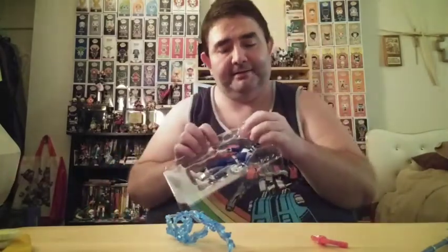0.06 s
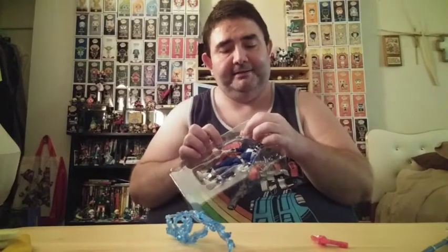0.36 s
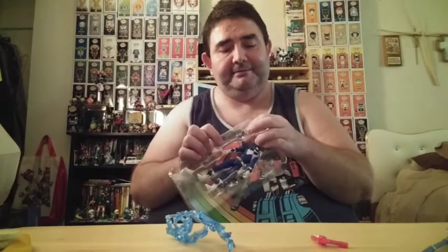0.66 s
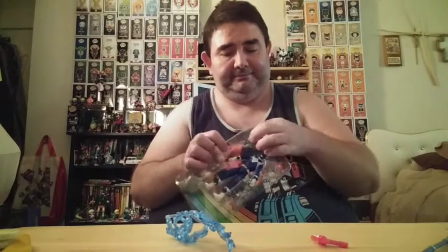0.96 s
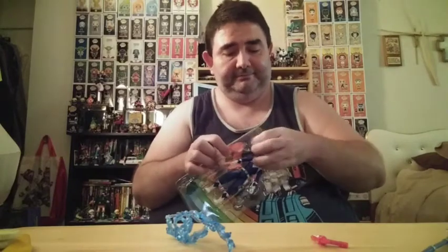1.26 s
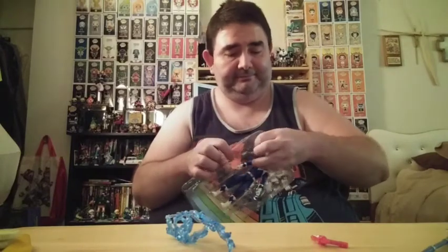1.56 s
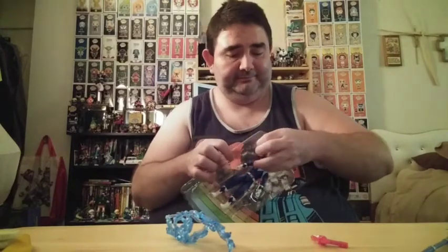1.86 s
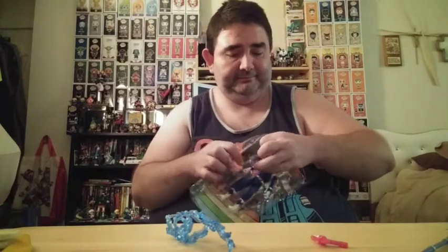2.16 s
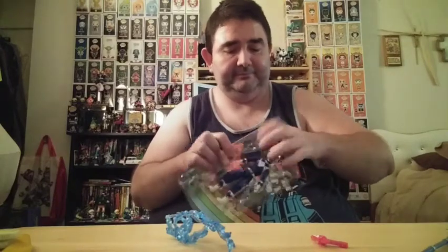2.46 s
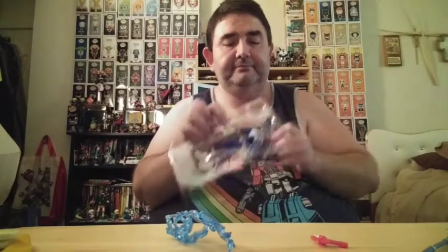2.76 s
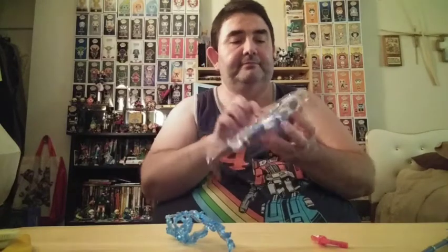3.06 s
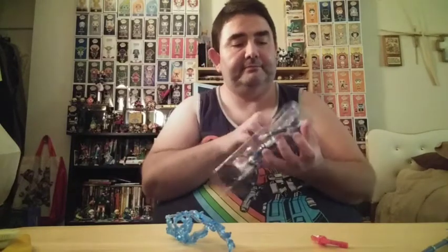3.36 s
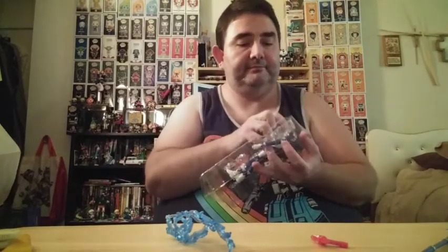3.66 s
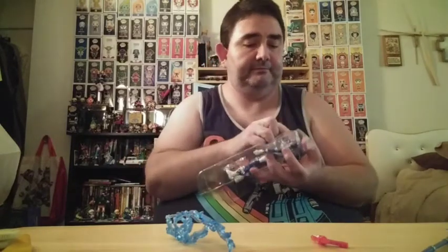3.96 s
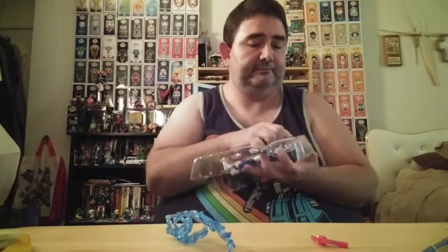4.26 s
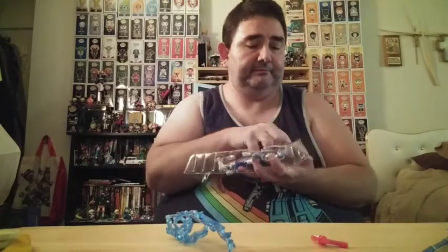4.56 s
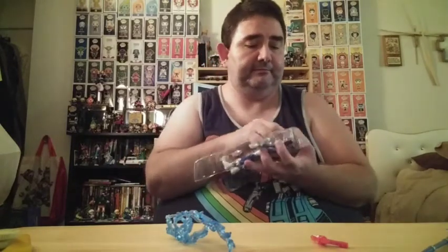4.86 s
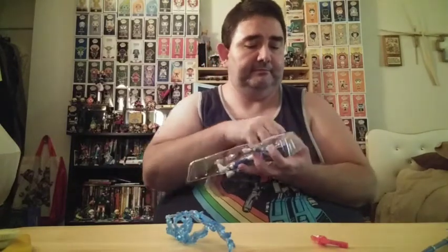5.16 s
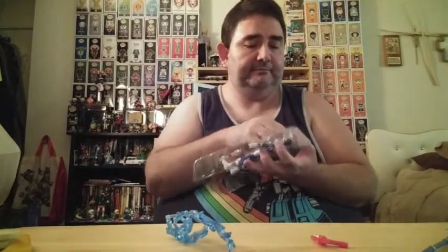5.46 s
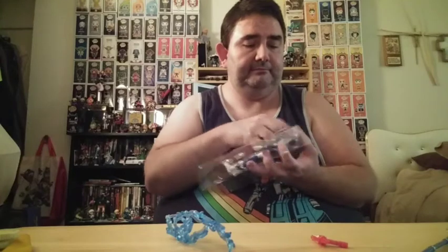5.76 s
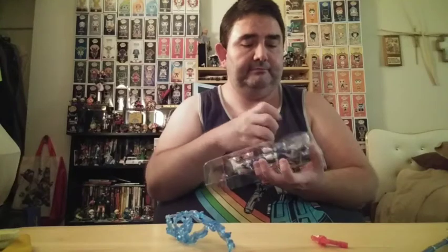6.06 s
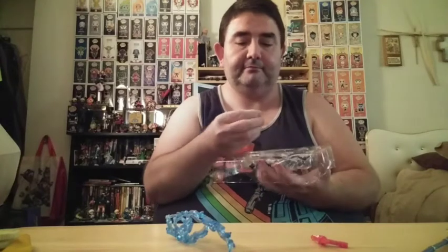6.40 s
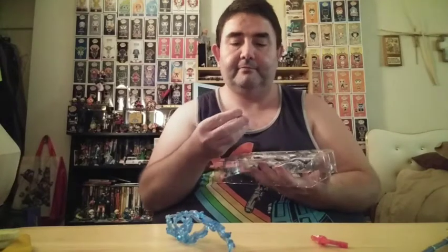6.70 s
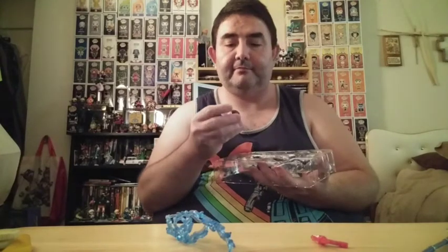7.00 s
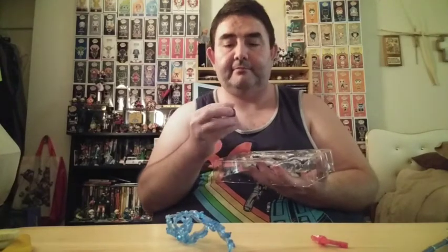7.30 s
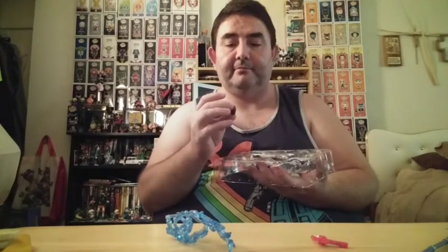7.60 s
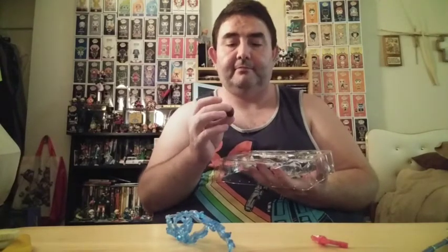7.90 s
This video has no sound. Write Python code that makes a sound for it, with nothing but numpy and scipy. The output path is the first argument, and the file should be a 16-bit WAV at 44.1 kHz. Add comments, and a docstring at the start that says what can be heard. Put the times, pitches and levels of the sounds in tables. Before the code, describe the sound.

Stiff plastic packaging snaps, pops and crackles in someone's hands in a small room, gradually thinning out to quiet.

```python
"""A small room: about a metre away, hands work a toy free from a stiff plastic blister tray.
Panels buckle with sharp snaps and hollow pops; creases crackle after them and the tray rings.
Fingers stick, slip and brush on the plastic in between; the arms bump softly a few times.
The walls answer each snap over faint mains hum and hiss."""
import sys
import numpy as np
from scipy import signal
from scipy.fft import rfft, irfft, next_fast_len
from scipy.io import wavfile
from scipy.ndimage import uniform_filter1d, minimum_filter1d

SR = 44100
rng = np.random.default_rng(int(sys.argv[2]) if len(sys.argv) > 2 else 0)


def materialize(psi):
    """Save the field psi as 16-bit PCM at rate SR to the path in sys.argv[1].

    A 1-D psi becomes a single channel; in a 2-D psi each row is a channel.
    """
    bounded = np.clip(np.atleast_2d(psi).T, -1, 1)
    quanta = np.round(bounded * 32767).astype(np.int16)
    wavfile.write(sys.argv[1], SR, quanta)


N = 354563

# Panel buckles: (time [s], relative level [dB], edge sharpness [dB], hollow body [dB], panel ring [Hz])
BUCKLES = [(0.0095, -29, -3, 0.5, 5730), (0.0816, -39.5, 11.5, 12, 700), (0.1947, -28, -4.5, -2, 1730),
           (0.2328, -21, 9, 1.5, 2440), (0.2437, -26.5, 8, 8.5, 1690), (0.2602, -21, 5, -23, 1800),
           (0.277, -22, 2, -22, 1790), (0.3294, -28, -16, 2.5, 530), (0.3516, -29, -16, -9, 1700),
           (0.3924, -37.5, -12, 8, 730), (0.4185, -24, -9.5, 4.5, 597), (0.436, -30.5, -12, -1, 1080),
           (0.5167, -46, 7.5, 19, 760), (0.642, -35.5, -0.5, 13.5, 413), (0.735, -67.5, 25, 6, 1440),
           (0.77, -35.5, -8.5, 2.5, 700), (0.8849, -43, -2, 16, 430), (0.985, -31.5, -19, 4, 1240),
           (1.0281, -29.5, -16, 7, 1860), (1.043, -22, -23, 1, 680), (1.1304, -21.5, -3, -8, 1900),
           (1.1627, -23.5, -9.5, 1, 1820), (1.2543, -44.5, 2, 12, 1250), (1.4839, -39, -8.5, 2, 2060),
           (1.5391, -30, -3.5, -6, 1050), (1.563, -36, -1, 4, 1080), (1.593, -21.5, -12, 0.5, 750),
           (1.6082, -29.5, -3.5, -1, 760), (1.6874, -45, -0.5, -2, 684), (1.792, -25, 4, 1, 1610),
           (1.8419, -26, -13, 0, 2600), (1.85, -27, 7, 13, 2620), (1.8896, -27.5, -11, 3.5, 750),
           (2.0284, -26.5, -0.5, -3, 1250), (2.052, -19.5, -11.5, 5.5, 2080), (2.1179, -21, 3.5, 2.5, 2300),
           (2.199, -25, -20, -5, 735), (2.25, -31, -37, 8.5, 760), (2.282, -26, -3.5, 6.5, 2450),
           (2.3005, -15.5, -2.5, -1, 2400), (2.3178, -28, 15.5, 10, 900), (2.3721, -26.5, 11, 13, 1720),
           (2.389, -27, -23, -3, 1830), (2.4474, -24.5, -4, 13, 690), (2.5674, -19, 0, -6.5, 2650),
           (2.6307, -31, -3.5, -2, 1460), (2.6412, -27, -23, 6.5, 680), (2.8996, -41, 6.5, -13, 1950),
           (2.9536, -44.5, 4, 10, 2080), (2.9781, -28, 7, -17, 3660), (2.9859, -25.5, -2.5, 1.5, 1400),
           (3.1368, -32, -7, -20, 1240), (3.1482, -26, -10.5, 1, 1490), (3.252, -35.5, 0.5, -2, 3100),
           (3.264, -25.5, -6.5, -5, 2110), (3.2889, -35, -5, 11.5, 1950), (3.3858, -37.5, 8.5, 3, 1160),
           (3.3985, -36.5, 5, -2, 1370), (3.4146, -49.5, 12, 29, 935), (3.4835, -42.5, -1.5, -4, 1260),
           (3.7221, -47.5, -2, 6, 900), (4.021, -41, -11, 10.5, 1310), (4.1412, -36.5, 12, 6, 2230),
           (4.3724, -33, 5.5, -20, 6100), (4.4885, -32, 4.5, -23, 5600), (4.5416, -36, -8, 1, 480),
           (4.561, -35.5, -24, -14, 1200), (4.6421, -31, -6, 10.5, 1060), (4.7097, -36.5, 5, 4, 2600),
           (4.7361, -35, 14, 9, 2470), (4.8509, -41.5, -3.5, 3, 1430), (4.96, -42.5, -2.5, -33, 2880),
           (4.974, -33.5, -16, 1.5, 1320), (5.0252, -49, 3.5, 9, 740), (5.0574, -66.5, 39, 6, 3320),
           (5.1236, -42.5, -5, 19.5, 940), (5.1813, -36, -31, -7, 1330), (5.253, -43, -39, -12, 1180),
           (5.2692, -29, -21, 13, 1040), (5.348, -48, 6.5, -1, 2650), (5.4043, -39.5, 16.5, -1, 2500),
           (5.603, -56, 7.5, 13.5, 3280), (5.7155, -45, 0, -9, 1340), (5.7996, -43.5, 18, 5, 2600),
           (5.9917, -50.5, 20.5, -11, 6240), (6.1332, -43.5, 0.5, -6.5, 2310),
           (6.3118, -50, -1.5, 1.5, 1000)]


def buckling(gain_db=38.5, hollow_db=-3, slips_db=-11, slips_t60_s=.05, lead_s=0.0027, lead_db=-20):
    """The crease gives a little, the panel snaps, a shower of smaller slips follows."""
    out = np.zeros(N)
    t = np.arange(SR // 8) / SR
    for s, db, edge_db, body_db, panel_hz in [*BUCKLES, *small_buckles()]:
        slips = (rng.random(len(t)) < 350 / SR) * rng.standard_normal(len(t))
        train = amp(slips_db) * unit(slips * fade(t, slips_t60_s) * (t > lead_s))
        train[0] += amp(lead_db)
        train[int(lead_s * SR)] += 1
        buckle = snap(body_db + hollow_db, edge_db, panel_hz)
        add(out, s - lead_s, amp(db + gain_db) * signal.fftconvolve(train, buckle))
    return out


# Thin-sheet radiation: (frequency [Hz], gain [dB])
SHEET_SPECTRUM = [(40, -38.5), (150, -36), (250, -7), (400, -4), (520, -0.5), (750, 5), (1300, 1),
                  (2500, -3), (3800, -8), (5200, -11.5), (6800, -17.5), (7800, -26.5), (9800, -29),
                  (12000, -41), (16000, -39.5)]
# Snap zones, bass, body, middle, crack, edge, top: (centre [Hz])
SNAP_ZONES_HZ = [190, 400, 950, 2300, 5500, 11000]


def snap(body_db, edge_db, panel_hz, bass_db=-3.5, delay_at_1khz_s=.0005, size=6144):
    """One buckle: a sharp kick, then bending waves criss-cross the sheet and ring the panel."""
    t, hz = np.arange(size) / SR, np.fft.rfftfreq(size, 1 / SR)
    kick, flutter, sway, scatter = (rfft(burst(t, t60_s)) for t60_s in (0.016, 0.074, 0.14, 0.07))
    # long waves decay more slowly
    waves = kick + flutter / (1 + (hz / 4800) ** 2) + 2 * amp(-7) * sway / (1 + (hz / 1300) ** 2)
    waves += amp(-9) * scatter  # off chest and table
    energy = uniform_filter1d(np.abs(waves) ** 2, size=71)
    crack_db, top_db = 2 + 0.39 * edge_db, 1.2 * edge_db
    zones = list(zip(SNAP_ZONES_HZ, [bass_db, body_db, 0, crack_db, edge_db, top_db]))
    radiation = causal(amp(along(SHEET_SPECTRUM, hz) + along(zones, hz)) / np.sqrt(energy))
    ring_db = 1 + 3 * np.log2(panel_hz / 1500)  # fingers damp the large, low panels
    panel = 1 + amp(ring_db) * resonance(hz, panel_hz, width_hz=150 + panel_hz / 8)
    dispersion = np.exp(-4j * np.pi * delay_at_1khz_s * np.sqrt(1000 * hz))  # lows arrive later
    return irfft(waves * radiation * panel * facets(hz) * dispersion)


def facets(hz, facet_db=-7.5, low_hz=700, high_hz=8000, q=10, count=7):
    """Each buckle stiffens different facets of the moulding; their modes add or cancel."""
    centres_hz = low_hz * (high_hz / low_hz) ** rng.random((count, 1))
    phases = np.exp(2j * np.pi * rng.random((count, 1)))
    modes = 1 + amp(facet_db) * np.sum(phases * resonance(hz, centres_hz, centres_hz / q), axis=0)
    in_band = (hz > low_hz) & (hz < high_hz)
    return modes / np.sqrt(np.mean(np.abs(modes[in_band]) ** 2))


def small_buckles(gain_db=-6, spread_db=7, body_db=3, low_hz=600, high_hz=3000, count=40):
    """Lesser panels give way at random, louder the harder the fingers press."""
    when, strength, sharpness, smallness = rng.random((count, 4)).T
    s = (np.arange(count) + when) / count * N / SR
    db = 20 * np.log10(effort(s) + 1e-9) + gain_db + spread_db * (strength - .5)
    edge_db = 1 + 18 * (sharpness - .5)
    panel_hz = low_hz * (high_hz / low_hz) ** smallness
    rows = np.column_stack([s, db, edge_db, np.full(count, body_db), panel_hz])
    return rows[effort(s) > 0]


# Whole-tray resonances: (frequency [Hz], width [Hz], relative gain [dB])
TRAY_MODES = [(433, 79, -2), (497, 61, -0.5), (497, 3.5, -5.5), (659.6, 22, -10), (920, 12, -16.5),
              (1143, 22, -5.5), (1300, 49, -4.5), (1750, 99, -9.5), (2195, 12, -12), (2760, 180, -7),
              (3160, 180, -9)]


def tray(x, modes_db=-5):
    """The tray rings on after every push."""
    size = next_fast_len(N + SR)
    hz = np.fft.rfftfreq(size, 1 / SR)
    modes = sum(amp(db) * resonance(hz, mode_hz, width_hz) for mode_hz, width_hz, db in TRAY_MODES)
    return irfft(rfft(x, size) * (1 + amp(modes_db) * modes), size)[:N]


# Finger work on the tray: (time [s], relative level [dB])
FINGER_EFFORT = [(0, -43.5), (0.14, -47), (0.36, -48), (0.58, -45.5), (0.85, -43), (1.14, -43.5),
                 (1.3, -48), (1.55, -41), (1.74, -48.5), (2.28, -37.5), (2.55, -48), (2.75, -58),
                 (3.15, -45), (3.36, -38.5), (3.8, -52.5), (4.25, -37.5), (4.6, -43), (4.85, -53),
                 (5.1, -46), (5.55, -52), (6.1, -53), (6.429, -62)]


def effort(t, rest_db=-65.5):
    """Finger effort above rest, as a gain."""
    s, db = np.transpose(FINGER_EFFORT)
    return np.maximum(amp(np.interp(t, s, db)) - amp(rest_db), 0)


# Skin on plastic: (frequency [Hz], gain [dB])
SKIN_SPECTRUM = [(60, -32), (180, -11), (350, -6.5), (750, 3), (1300, 1), (2500, -4), (4500, -18),
                 (8000, -31.5), (16000, -49.5)]
# Small creases: (frequency [Hz], gain [dB])
CREASE_SPECTRUM = [(200, -26), (1000, -1.5), (2800, 2.5), (6300, -1.5), (8000, -20), (10000, -11.5),
                   (12500, -20.5), (16000, -27.5)]


def rubbing(rub_db=-3, crackle_db=-19):
    """Skin sticks and slips, small creases tick; both follow finger effort."""
    skin = steady(colour(grains(rate_hz=550, spread_db=0.5), SKIN_SPECTRUM))
    ticks = steady(colour(grains(rate_hz=38, spread_db=6), CREASE_SPECTRUM))
    return effort(np.arange(N) / SR) * (amp(rub_db) * skin + amp(crackle_db) * ticks)


# Finger and forearm slides: (peak time [s], length [s], relative level [dB], centre [Hz])
STROKES = [(0.89, 0.057, -34.5, 1250), (3.73, 0.04, -43, 1150), (3.99, 0.08, -46.5, 2900),
           (4.26, 0.058, -52, 1140), (4.7, 0.059, -34.5, 990), (5.79, 0.062, -41.5, 1010),
           (6.09, 0.035, -46.5, 695), (6.355, 0.076, -46.5, 1050), (6.655, 0.073, -52.5, 903),
           (7.285, 0.03, -59, 780)]


def brushing(gain_db=-2, width_at_1khz_oct=0.97, size=16384):
    """Smooth slides: dense slips swell and fade with stroke speed."""
    out, t = np.zeros(N), (np.arange(size) - size / 2) / SR
    slips, hz = grains(rate_hz=2500, spread_db=5), np.fft.rfftfreq(size, 1 / SR)
    for k, (s, length_s, db, centre_hz) in enumerate(STROKES):
        width_oct = width_at_1khz_oct * (1000 / centre_hz) ** 1.1  # stiff edges: higher, narrower
        offset = np.abs(np.log2((hz + 1) / centre_hz)) / width_oct
        friction = irfft(rfft(slips[k * size:(k + 1) * size]) / (1 + offset ** 3))
        swell = np.exp(-2 * (t / length_s) ** 2)
        add(out, s + t[0], amp(db + gain_db) * swell * steady(friction))
    return out


# Arm bumps: (time [s], relative level [dB])
ARM_BUMPS = [(0.233, -48), (0.641, -55), (1.591, -50), (2.984, -46), (3.14, -46.5), (3.268, -39),
             (5.27, -58)]


def bumps(t60_s=0.55, band_hz=(30, 340), gain_db=-4):
    """Dull, low thuds of the arms."""
    out, t = np.zeros(N), np.arange(SR // 2) / SR
    bandpass = signal.butter(2, band_hz, "band", fs=SR, output="sos")
    for s, db in ARM_BUMPS:
        thud = signal.sosfilt(bandpass, rng.standard_normal(len(t)))
        add(out, s, amp(db + gain_db) * steady(thud) * fade(t, t60_s))
    return out


# Reverberation: (frequency [Hz], T60 [s])
WALL_DECAY = [(200, 0.58), (530, 0.21), (1400, 0.23), (3700, 0.22), (9700, 0.23)]


def walls(size, build_s=0.0095):
    """Wall reflections from one position; the bass lasts longest."""
    t, hz = np.arange(size) / SR, np.fft.rfftfreq(size, 1 / SR)
    centres_hz, t60s = np.transpose(WALL_DECAY)
    noise = rfft(rng.standard_normal(size))
    bands = [irfft(noise * along(list(zip(centres_hz, share)), hz)) for share in np.eye(len(t60s))]
    tail = sum(band * fade(t, t60_s) for band, t60_s in zip(bands, t60s))
    return unit(tail * np.minimum(t / build_s, 1))


def room(x, tail_db=-5.0, side_db=-14, side_t60_s=0.027, side_above_hz=4500, size=16384):
    """Direct sound plus reflections that change as the tray moves; only the treble has width."""
    mid, padded = x.copy(), np.pad(x, size)
    window = signal.get_window("hann", size)
    for i in range(size // 2, N + size, size // 2):
        wash = signal.fftconvolve(padded[i:i + size] * window, walls(size))
        add(mid, (i - size) / SR, amp(tail_db) * wash[max(size - i, 0):])
    wide = signal.fftconvolve(x, burst(np.arange(size) / SR, side_t60_s))[:N]
    highpass = signal.butter(12, side_above_hz, "high", fs=SR, output="sos")
    side = amp(side_db) * signal.sosfilt(highpass, wide)
    return mid + np.array([side, -side])


# Still room: (frequency [Hz], relative density [dB])
AIR_SPECTRUM = [(20, -43), (35, -26.5), (55, -6), (85, -2), (130, -6), (200, -2), (400, -5), (800, -10),
                (1500, -13.5), (3000, -15.5), (6500, -20.5), (8000, -28), (12000, -28), (16000, -35.5)]
# Mains hum: (frequency [Hz], rms level [dB])
HUM_TONES = [(60, -79.5), (120, -77.5), (301, -75), (360.5, -78.5), (420, -76)]


def background(air_db=-62.0):
    """Soft room noise and mains hum."""
    t = np.arange(N) / SR
    hum = sum(np.sqrt(2) * amp(db) * np.sin(2 * np.pi * (hz * t + rng.random())) for hz, db in HUM_TONES)
    return amp(air_db) * steady(colour(rng.standard_normal(N), AIR_SPECTRUM)) + hum


def amp(db):
    """Decibels to gain."""
    return 10 ** (np.asarray(db) / 20)


def unit(x):
    """Scale to unit energy."""
    return x / np.sqrt(np.sum(x ** 2) + 1e-18)


def steady(x):
    """Scale to unit rms."""
    return x / np.std(x)


def along(points, hz):
    """Interpolate (frequency [Hz], value) points in log frequency."""
    points_hz, values = np.transpose(points)
    return np.interp(np.log(hz + 0.0011), np.log(points_hz), values)


def colour(x, points):
    """Filter by (frequency [Hz], gain [dB]) points."""
    size = next_fast_len(len(x))
    gain = amp(along(points, np.fft.rfftfreq(size, 1 / SR)))
    return irfft(rfft(x, size) * gain, size)[:len(x)]


def resonance(hz, centre_hz, width_hz):
    """Complex response of one damped mode."""
    return 1 / (1 + 2j * (hz - centre_hz) / width_hz)


def causal(gain):
    """Minimum-phase response of this magnitude."""
    cepstrum = irfft(np.log(gain + 1e-9))
    half = len(cepstrum) // 2
    cepstrum[1:half] *= 2
    cepstrum[half + 1:] = 0
    return np.exp(rfft(cepstrum))


def fade(t, t60_s):
    """Exponential decay, 60 dB in t60_s."""
    return amp(-60 * t / t60_s)


def burst(t, t60_s):
    """Decaying noise of unit energy."""
    return unit(rng.standard_normal(len(t)) * fade(t, t60_s))


def grains(rate_hz, spread_db):
    """Tiny clicks of random time, size and sign."""
    sizes = amp(spread_db * np.clip(rng.standard_normal(N), -2, 2))
    return steady((rng.random(N) < rate_hz / SR) * sizes * rng.choice([-1, 1], N))


def add(track, start_s, sound):
    """Mix a sound in at start_s."""
    i = max(int(start_s * SR), 0)
    track[i:i + len(sound)] += sound[:max(len(track) - i, 0)]


def scene():
    """The handled tray in the room."""
    return room(tray(buckling() + rubbing() + brushing())) + bumps() + background()


def record(dry, ceiling=.88, window_samples=89, cutoff_hz=16100):
    """A limiter ducks the loudest cracks; a low-pass cuts the top."""
    needed = np.minimum(1, ceiling / (np.abs(dry).max(axis=0) + 1e-9))
    gain = uniform_filter1d(minimum_filter1d(needed, window_samples), window_samples)
    return signal.sosfilt(signal.ellip(10, .2, 70, cutoff_hz, fs=SR, output="sos"), dry * gain)


dry = scene()
out = record(dry)
materialize(out)
```